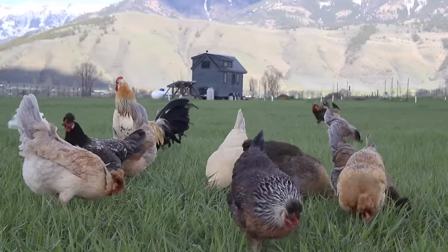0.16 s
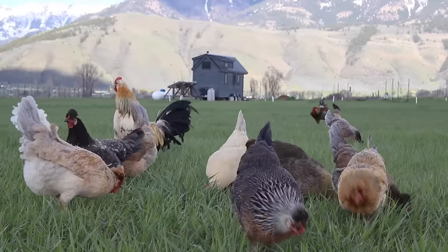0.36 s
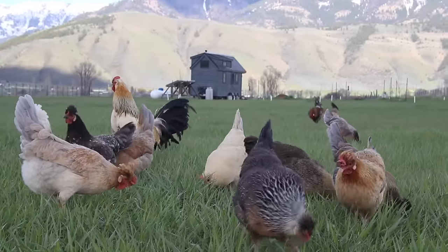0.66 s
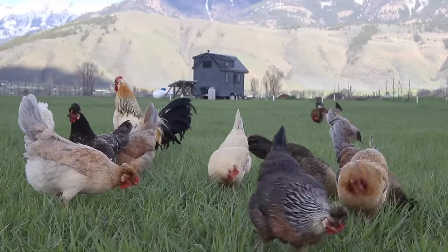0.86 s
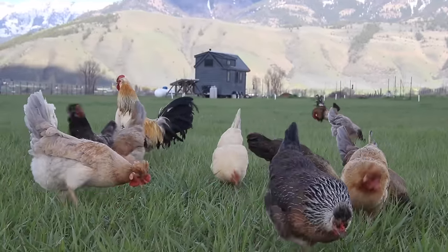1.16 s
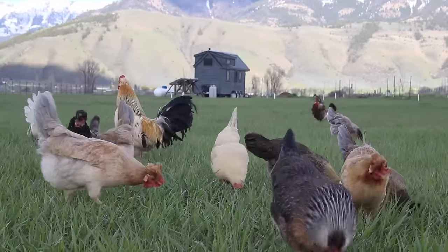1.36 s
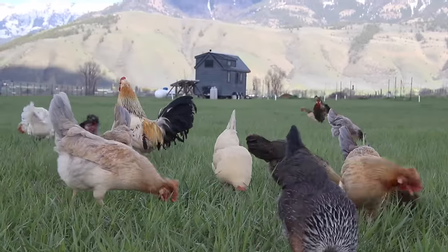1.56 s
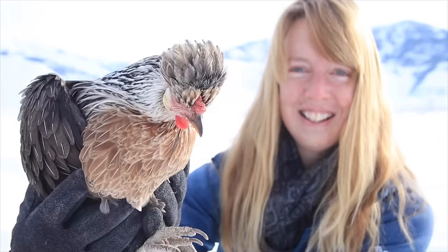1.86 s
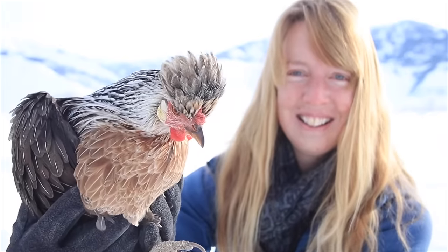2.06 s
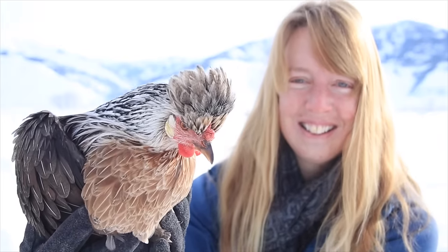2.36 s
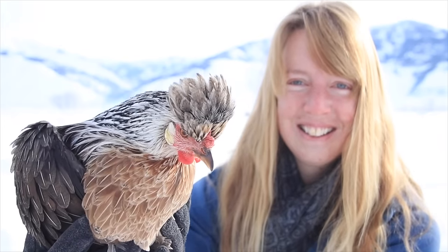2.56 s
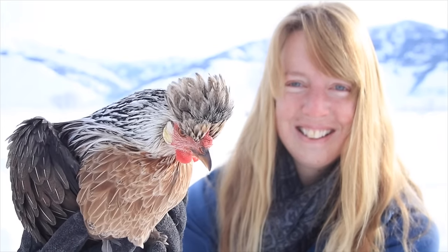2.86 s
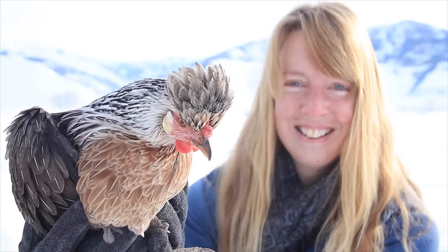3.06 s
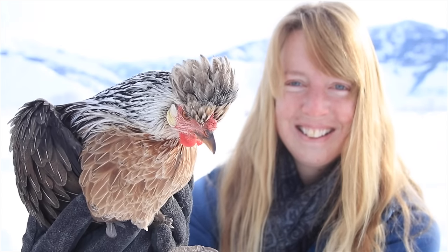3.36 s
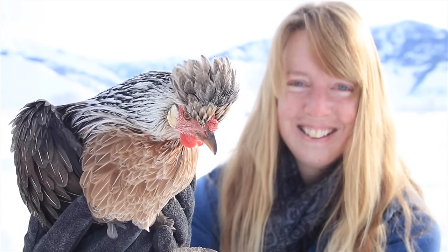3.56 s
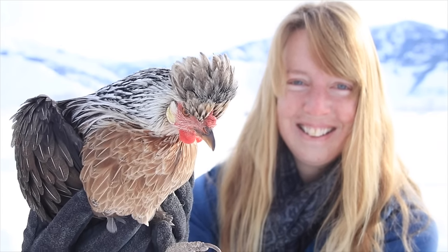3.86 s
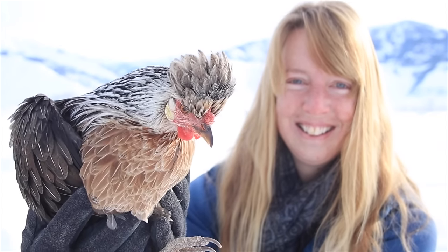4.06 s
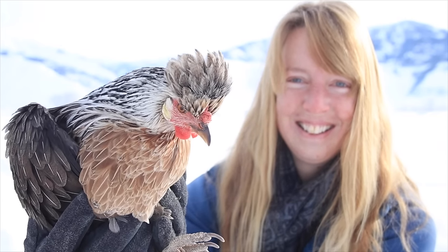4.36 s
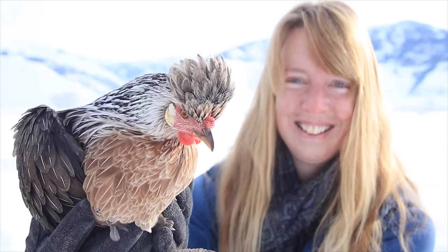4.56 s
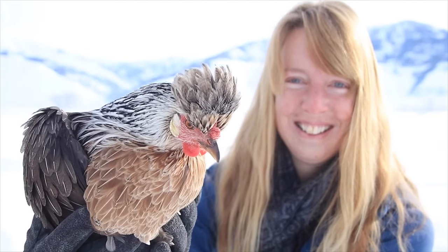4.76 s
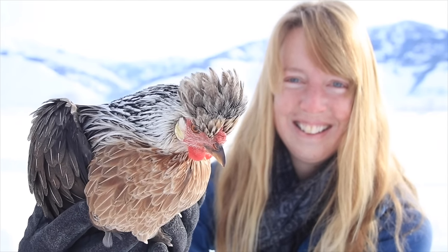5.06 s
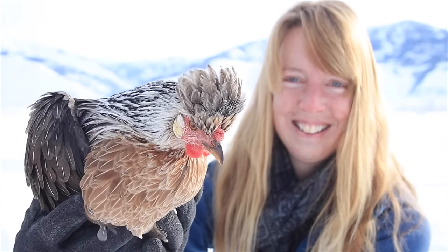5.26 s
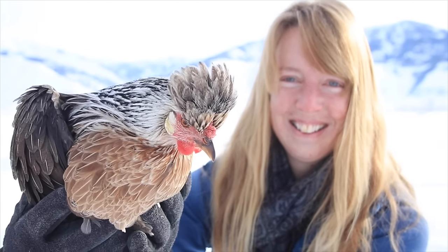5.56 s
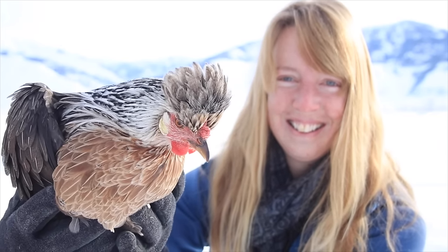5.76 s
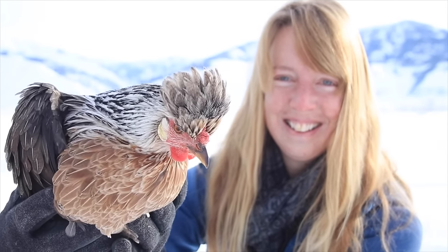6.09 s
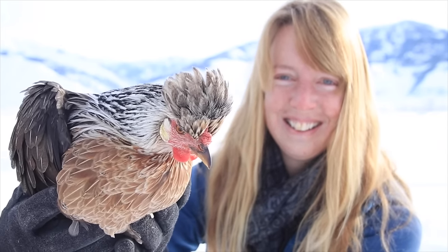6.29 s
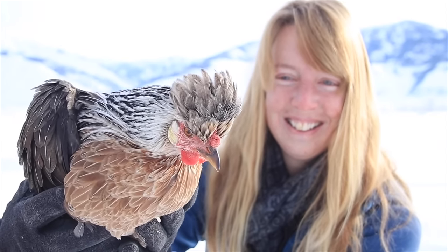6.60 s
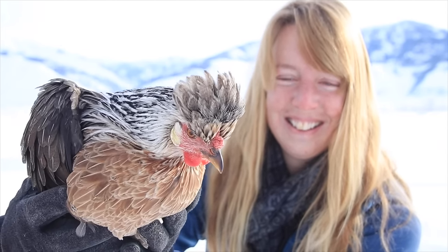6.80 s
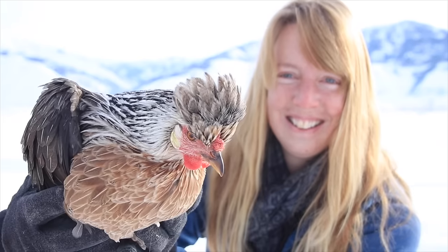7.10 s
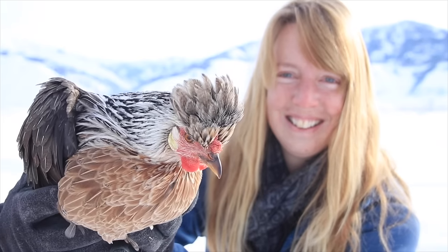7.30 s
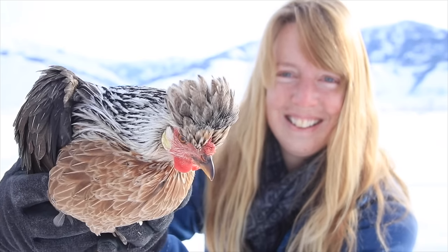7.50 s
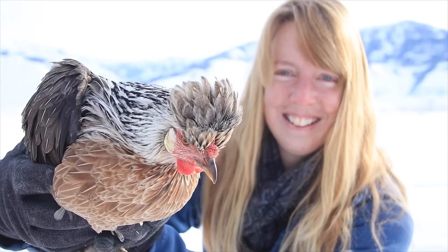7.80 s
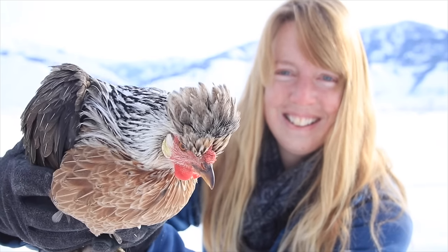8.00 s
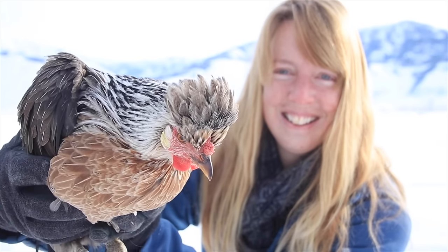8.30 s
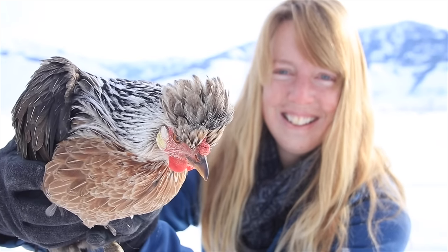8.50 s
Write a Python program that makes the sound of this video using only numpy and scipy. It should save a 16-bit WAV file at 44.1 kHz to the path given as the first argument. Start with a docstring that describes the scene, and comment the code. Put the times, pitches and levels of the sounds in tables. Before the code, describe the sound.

The sound opens in a field with low, rumbling wind buffeting the microphone, strongest around 0.5 seconds, over faintly rustling grass. At about 1.75 seconds it cuts to a blink of silence. A hen then cackles close by in short, slightly hoarse clucks, four or five a second, with a slight echo off nearby walls. She gives a long, loud squawk at 2.8 seconds, followed by a sharp cluck and more clucking. From about 4.5 to 5.9 seconds she nearly stops, and a distant hen answers softly. The close clucks resume, with a second long squawk at 6.6 seconds and two strong clucks after it, then continue evenly until about 8.6 seconds. Other chickens croon faintly in the second half, and a small bird peeps very quietly. Soft footfalls and dry ticks come near 3.9 and 8 seconds, over a low murmur of outdoor air.

```python
"""Field wind, then a cackling hen

Gusts buffet a microphone and stir grass. After a blink of silence a hen cackles close by in a yard:
syrinx harmonics shaped by throat and beak, in short arching clucks and two long squawks, echoed by walls.
A far hen answers, others croon and grunt, a small bird peeps; dry ticks and footfalls over murmuring air."""
import sys
import numpy as np
from scipy import signal
from scipy.io import wavfile
from scipy.ndimage import uniform_filter1d

SR = 44100
rng = np.random.default_rng(int(sys.argv[2]) if len(sys.argv) > 2 else 0)


def store_wav(level_fs):
    """Save 16-bit WAV to argv[1]."""
    pcm = np.round(np.clip(np.atleast_2d(level_fs), -1, 1) * 32767)
    wavfile.write(sys.argv[1], SR, pcm.T.astype(np.int16))


N = 381024

# clucks: t/s, level/dB, top f/Hz, length/s, hoarseness/0-1
NEAR_CLUCKS = [(1.784, -17.5, 449.4, 0.037, 0.38), (2.031, -17, 460.2, 0.066, 0.77),
               (2.281, -17, 449, 0.061, 0.32), (2.492, -18, 450, 0.073, 0.25),
               (2.715, -17, 455, 0.064, 0.3), (3.008, -16.5, 472, 0.042, 0), (3.184, -10, 547, 0.069, 0.11),
               (3.405, -15.5, 471.5, 0.068, 0), (3.621, -18.5, 452, 0.06, 0.14),
               (3.904, -21, 398, 0.052, 0.25), (4.137, -19.5, 417.4, 0.048, 0), (4.39, -23, 409, 0.043, .2),
               (5.226, -19, 452, 0.051, 0.18), (5.913, -21, 402.6, 0.055, 0.1),
               (6.12, -20.5, 438.4, 0.056, 0.18), (6.328, -20, 431.7, 0.058, 0.26),
               (6.554, -18, 461.5, 0.06, 0.2), (6.995, -11, 557, 0.05, .15), (7.188, -13, 486, 0.07, 0.17),
               (7.412, -17.5, 461.5, 0.067, .2), (7.657, -19.5, 457, 0.065, 0.37),
               (7.856, -18, 457.5, 0.067, 0.2), (8.081, -17, 459.5, 0.067, 0.4),
               (8.304, -16.5, 458.5, 0.066, 0.25), (8.501, -17.5, 454.2, 0.065, .1)]
FAR_CLUCKS = [(3.755, -45, 457, 0.052, 0.33), (4.595, -39.5, 453, 0.034, 0.24),
              (4.835, -41, 411, 0.027, 0.16), (5.02, -39.5, 449, 0.039, 0.15),
              (5.46, -38.5, 479, 0.052, 0.186), (5.725, -39.5, 443, 0.035, 0.16)]
# one contour per squawk: t/s, level/dB, f/Hz
NEAR_SQUAWKS = [
    [(2.809, -14.5, 474), (2.82, -15.5, 592), (2.845, -6, 609.3), (2.885, -15, 629), (2.95, -10.5, 637.8),
     (2.968, -14.5, 650), (2.982, -17, 687), (3.012, -15.5, 680), (3.036, -25, 541)],
    [(6.636, -21, 502), (6.646, -11.5, 580.5), (6.658, -10, 613.4), (6.7, -7, 616), (6.77, -23, 628.7),
     (6.792, -12, 650), (6.82, -15.5, 690), (6.836, -18, 627), (6.862, -22, 506)],
]
# held notes: t/s, length/s, level/dB, first f/Hz, last f/Hz, loudest point/0-1
FAR_SQUAWKS = [(4.535, 0.24, -54.5, 648, 704, 0.1), (6.843, .28, -37.5, 659, 698, 0.38)]
CROONS = [(5.3, 0.98, -54.5, 195, 211, 0.48), (6.801, 0.55, -54.5, 202.4, 213, .3),
          (7.451, 1.17, -49.5, 258, 266, 0.31)]
GRUNTS = [(1.832, 0.026, -28, 209.4, 203.6, 0.72)]
PEEPS = [(4.228, 0.032, -64.5, 3930, 3520, .4), (4.315, 0.029, -66, 2100, 1810, .3),
         (6.326, 0.026, -58, 2750, 3770, .5), (6.348, 0.035, -59, 3780, 3730, .2),
         (7.27, 0.032, -62, 4250, 3980, .5), (7.3, .02, -60, 4040, 2580, .6),
         (7.32, 0.035, -57.5, 2680, 2490, .3), (7.32, 0.036, -59, 2350, 1840, .3)]
# throat responses: f/Hz, gain/dB
BEAK_SHUT = [(250, -25.5), (440, -24), (560, -22.5), (700, -10), (910, 0), (1100, -3.5), (1380, -20),
             (1600, -38), (2250, -29.5), (2700, -37.5), (3300, -30), (3700, -31.5), (4300, -44),
             (5400, -55.5), (9000, -65.5)]
BEAK_OPEN = [(400, -30.5), (620, -10), (950, 5), (1280, 6.5), (1400, 8), (1600, -38), (2050, -16),
             (2700, -21.5), (3400, -24), (4900, -36), (8000, -46.5), (15700, -58.5)]
BEAK_OPEN_FAR = [(400, -35), (660, -9.5), (1350, 3), (1600, -21.5), (2050, -16), (2700, -18), (4100, -24.5),
                 (5000, -43)]
CROON_THROAT = [(200, -2), (260, -3.5), (420, 0.5), (560, -12.5), (800, -26)]
GRUNT_THROAT = [(200, 1.5), (570, -14.5), (1030, 3.5), (1470, -17), (2070, -13), (2490, -29), (3290, -18.5),
                (4600, -47), (5500, -30)]
# wall echoes: delay/s, gain/dB
WALL_ECHOES = [(.0045, -13), (.011, -15), (.017, -11), (.024, -14.5), (.032, -28.5), (.046, -26.5)]
# gusts: t/s, buffet level/dB, rumble level/dB
GUSTS = [(0.0, -45.5, -52), (0.16, -34, -59), (0.3, -20.5, -35.5), (0.374, -22.5, -68), (0.422, -8.5, -25),
         (0.476, -18.5, -32), (0.534, -6.5, -10), (0.568, -14, -36), (0.704, -28.5, -58), (0.806, -24, -44),
         (0.908, -32, -48), (1.004, -16, -48), (1.228, -27.5, -58), (1.276, -27, -61), (1.432, -40.5, -56),
         (1.496, -31, -43.5), (1.544, -31, -62), (1.745, -22, -43)]
# grass stirring: mid t/s, half-width/s, rustle rise/dB, hiss rise/dB
GRASS_STIRS = [(.1, 0.039, 2, 2), (.45, 0.064, 3, 5), (.65, 0.078, 6.5, 8.5), (.85, 0.099, 2, 5.5),
               (1.05, 0.08, 12, 7), (1.2, 0.092, 11, 2), (1.31, 0.057, 2.5, 4.5), (1.43, 0.069, 4, 7),
               (1.72, 0.19, 3.5, 4.5)]
# short dry ticks, and one faint mid-range wash of air fading over a second as the yard begins:
# t/s, level/dB, f/Hz, t60/s
NOISE_BURSTS = [(.394, -32.5, 1210, 0.063), (.935, -34, 3800, 0.0095), (1.578, -25.5, 3650, 0.0051),
                (1.598, -37, 1940, 0.013), (1.869, -53.5, 1570, 0.99), (3.8, -44, 3320, 0.11),
                (3.836, -43, 3200, 0.018), (3.869, -46, 3020, 0.029), (3.897, -51, 3220, 0.055),
                (7.861, -16.5, 300, 0.014), (8.008, -52, 2430, 0.13), (8.399, -49, 2010, 0.075)]
# footfalls: t/s, upper mode level/dB, lower mode level/dB
THUMPS = [(3.867, -33, -73), (3.902, -31.5, -42), (7.001, -45, -42), (8.004, -31, -48), (8.074, -33, -54.5)]
# board underfoot: f/Hz, t60/s
BOARD_MODES = [(218.5, 0.19), (68.6, 0.74)]
# yard air spectrum: f/Hz, relative density/dB
AIR_SPECTRUM = [(18, 5.5), (30, -32), (64, -14.5), (120, 1), (197, -4), (249, -1.5), (399, 0.5),
                (467, -2.5), (808, -7), (1290, -13), (1640, -22), (2760, -25.5), (15500, -28)]
# left-right likeness of noise: f/Hz, coherence/0-1
COHERENCE = [(250, .9993), (600, 1), (1500, 1), (3000, 0.95), (6000, 0.46), (12000, 0.53)]

FIELD_END_S, YARD_START_S = 1.748, 1.787


def cluck(start_s, db, top_hz, length_s, hoarse, unrest):
    """One push of air: pitch leaps, holds, sags. Higher clucks leap sooner and open the beak wider."""
    usual_hz = 438.5
    u = np.arange(0, 1, 1 / (length_s * SR))
    arch = 1 - 0.42 * np.exp(-(u / 0.3 * (top_hz / usual_hz) ** 2.5) ** 2.15) - 0.31 * u ** 7.3
    hz = top_hz * arch / arch.max()
    push = np.sin(np.pi * u ** 1.213)
    gape_db = -3.5 + 6 * np.tanh((top_hz - usual_hz) / 44.8)
    treble_db = gape_db - 16 * (1 - push ** 0.91)
    tone = syrinx(start_s, hz, 0.3, BEAK_SHUT, unrest, treble_db, hoarse * push ** 2)
    return start_s, amp(db) * push ** 1.057 * tone


def squawk(contour, unrest):
    """Long open-beak cry, rough as it catches and breaks off."""
    times_s, db, hz = np.transpose(contour)
    start_s, end_s = times_s[0], times_s[-1]
    t = np.arange(start_s, end_s, 1 / SR)
    db, hz = np.interp(t, times_s, db), np.interp(t, times_s, hz)
    rough = 0.35 * np.exp((start_s - t) / 0.015) + 0.64 * np.exp(-((end_s - t) / 0.038) ** 2)
    treble_db = 0.1424 * (hz - 611) - 0.62 * (db - db.max())  # rises with pitch, resists level dips
    fade = np.clip(np.minimum(t - start_s, end_s - t) / 0.0013, 0, 1)
    return start_s, unit_rms(syrinx(start_s, hz, rough, BEAK_OPEN, unrest, treble_db)) * amp(db) * fade


def held_note(start_s, length_s, db, first_hz, last_hz, peak_at, throat, unrest,
              rough, settle, dip_db, scoop=0):
    """Gliding call that swells and fades; scoop lowers the pitch at both ends."""
    u = np.arange(0, 1, 1 / (length_s * SR))
    glide_hz = last_hz + (first_hz - last_hz) * (1 - u) ** settle
    hz = glide_hz * (1 - scoop * (np.exp(-u / 0.05) + u ** 6))
    swell_db = -dip_db * np.where(u < peak_at, 1 - u / peak_at, (u - peak_at) / (1 - peak_at)) ** 2
    fade = np.clip(np.minimum(u, 1 - u) * length_s / 0.0039, 0, 1)
    return start_s, unit_rms(syrinx(start_s, hz, rough, throat, unrest)) * amp(db + swell_db) * fade


def syrinx(start_s, hz, rough, throat, unrest, treble_db=0, hoarse=0):
    """Harmonics weighted by the throat; roughness shakes each one and the pitch."""
    slow, fast = (rows[:, round(start_s * SR):][:, :len(hz)] for rows in unrest)
    phase = 2 * np.pi * np.cumsum(hz * (1 + 0.073 * rough * fast[0])) / SR
    out = np.zeros(len(hz))
    for k in range(1, int(throat[-1][0] / hz.max()) + 1):
        drift = 0.33 * np.log(max(k / 2, 1)) * slow[k % len(slow)]
        breath = (rough * (0.016 + 0.03 * k) + 0.013 * k) * fast[k % len(fast)]
        # a wider beak passes more above the main resonance
        gape_db = treble_db * np.clip(k * hz / 800 - 2, 0, 1) * np.clip(1.6 - k * hz / 7000, 0.3, 1)
        harmonic = (1 + drift) * np.sin(k * phase) + breath * np.cos(k * phase)
        out += amp(curve_at(throat, k * hz) + gape_db) * harmonic
        # every other pulse weakens: lines between harmonics
        half_harmonic = hoarse * min(k / 2, 1) ** 2 * np.sin((k + 0.5) * phase)
        out += amp(curve_at(throat, (k + 0.5) * hz) + gape_db) * half_harmonic
    return out


def birds():
    """Near hen, peeps and grunt; far flock with more echo tail."""
    near, far = np.zeros(N), np.zeros(N)
    unrest = wobble(N + SR, width=700, rows=9), wobble(N + SR, width=25, rows=9)
    for row in NEAR_CLUCKS:
        add(near, *cluck(*row, unrest))
    for contour in NEAR_SQUAWKS:
        add(near, *squawk(contour, unrest))
    for row in FAR_CLUCKS:
        add(far, *cluck(*row, unrest))
    for row in FAR_SQUAWKS:
        add(far, *held_note(*row, BEAK_OPEN_FAR, unrest, rough=0.46, settle=1.5, dip_db=17, scoop=0.135))
    for row in CROONS:
        add(far, *held_note(*row, CROON_THROAT, unrest, rough=0.2, settle=1.456, dip_db=10))
    for row in PEEPS:
        fundamental_only = [(1000, 0), (max(row[3:5]) + 1, 0)]
        add(near, *held_note(*row, fundamental_only, unrest, rough=0.085, settle=0.97, dip_db=6))
    near = butter(near, 260, "highpass", order=4)  # a small body radiates no bass
    for row in GRUNTS:
        add(near, *held_note(*row, GRUNT_THROAT, unrest, rough=0.5, settle=0.92, dip_db=3))
    return yard_echoes(near, tail_db=-15.5, t60_s=0.16) + yard_echoes(far, tail_db=-4, t60_s=0.22)


def yard_echoes(x, tail_db, t60_s):
    """Single echoes off near walls, plus a sparse tail."""
    t = np.arange(SR // 3) / SR
    tail = np.sign(rng.standard_normal(len(t))) * (rng.random(len(t)) < 0.05)
    tail *= amp(-60 * t / t60_s) * (t > 0.02)
    taps = amp(tail_db) * tail / np.linalg.norm(tail)
    taps[0] = 1
    for delay_s, db in WALL_ECHOES:
        taps[round(delay_s * SR)] += amp(db)
    return signal.oaconvolve(x, taps / np.linalg.norm(taps))[:N]


def wind_buffet(max_swing=0.75):
    """Gust pressure, nearly alike on both sides, on a diaphragm of limited swing."""
    t = np.arange(N) / SR
    times_s, *levels_db = np.transpose(GUSTS)
    buffet_db, rumble_db = (uniform_filter1d(np.interp(t, times_s, db), size=600) for db in levels_db)
    eddies = rng.standard_normal((2, 1, N)) + 0.013 * rng.standard_normal((2, 2, N))
    buffet = flatten_swells(butter(eddies[0], [11, 30], "bandpass"), width=2600)
    rumble = flatten_swells(butter(eddies[1], [55, 125], "bandpass"), width=1300)
    pressure = amp(buffet_db) * buffet + amp(rumble_db) * rumble
    return butter(max_swing * np.tanh(pressure / max_swing), 190, "lowpass")


def noise_bursts():
    """Decaying band noise: dry ticks and one slow, faint wash of air."""
    out, t = np.zeros(N), np.arange(SR // 2) / SR
    for start_s, db, hz, t60_s in NOISE_BURSTS:
        burst = unit_rms(butter(rng.standard_normal(len(t)), [0.48 * hz, 1.2 * hz], "bandpass"))
        add(out, start_s, amp(db - 60 * t / t60_s) * burst)
    return out


def footfalls():
    """Damped board modes with a low puff."""
    out, t = np.zeros(N), np.arange(SR // 2) / SR
    attack = np.clip(t / 0.0017, 0, 1)
    for start_s, *modes_db in THUMPS:
        for db, (hz, t60_s) in zip(modes_db, BOARD_MODES):
            puff = 0.94 * wobble(len(t), width=round(SR / hz / 3))[0]
            add(out, start_s, amp(db - 60 * t / t60_s) * (np.sin(2 * np.pi * hz * t) + puff) * attack)
    return out


def grass(rustle_db=-56.5, hiss_db=-57):
    """Blades rustle and crackle, louder when stirred."""
    t = np.arange(N) / SR
    for mid_s, half_width_s, rustle_rise_db, hiss_rise_db in GRASS_STIRS:
        stir = np.exp(-((t - mid_s) / half_width_s) ** 4)
        rustle_db += rustle_rise_db * stir
        hiss_db += hiss_rise_db * stir
    rustle = patchy_noise([(150, -3), (300, -1), (1000, -6), (3000, -19), (5000, -30)], patch_db=2)
    hiss = patchy_noise([(2000, -3), (3200, -0.5), (7000, -6), (12000, -5), (16000, -6)], patch_db=2)
    crackle = amp(1.6 * wobble(N, width=60))
    return amp(rustle_db) * rustle + amp(hiss_db) * unit_rms(hiss * crackle)


def yard_air():
    """Low murmur with little deep bass."""
    return amp(-50.5) * butter(patchy_noise(AIR_SPECTRUM, patch_db=1.5), 55, "highpass")


def patchy_noise(spectrum, patch_db):
    """Stereo noise, rms 1, uneven in time and frequency. Spectrum: f/Hz, level/dB."""
    frames, hz = N // 256 + 5, np.fft.rfftfreq(1024, 1 / SR)
    left_re, left_im, other_re, other_im, patches = rng.standard_normal((frames, 513, 5)).T
    patches = unit_rms(uniform_filter1d(uniform_filter1d(patches, size=8, axis=0), size=14, axis=1))
    coherence = np.clip(curve_at(COHERENCE, hz), 0, 1)[:, None]
    left = left_re + 1j * left_im
    right = coherence * left + np.sqrt(1 - coherence ** 2) * (other_re + 1j * other_im)
    bins = np.array([left, right]) * amp(curve_at(spectrum, hz)[:, None] + patch_db * patches)
    return unit_rms(signal.istft(bins, nperseg=1024, noverlap=768)[1][:, :N])


def wobble(count, width, rows=1):
    """Noise smoothed over width samples, rms 1."""
    return unit_rms(uniform_filter1d(uniform_filter1d(rng.standard_normal((rows, count)), width), width))


def flatten_swells(x, width):
    """Divides by local power, so each gust arrives at its strength."""
    return unit_rms(x / (uniform_filter1d(x ** 2, width) + 1e-12) ** 1.07)


def butter(x, hz, kind, order=2):
    return signal.sosfilt(signal.butter(order, hz, kind, fs=SR, output="sos"), x)


def curve_at(points, hz):
    points_hz, values = np.transpose(points)
    return np.interp(np.log(hz + 1), np.log(points_hz + 1), values)


def amp(db):
    return 10 ** (np.asarray(db) / 20)


def unit_rms(x):
    return x / np.sqrt(np.mean(x ** 2) + 1e-20)


def add(mix, start_s, sound):
    part = mix[round(start_s * SR):][:len(sound)]
    part += sound[:len(part)]


def scene():
    """Field, brief silence, yard."""
    t = np.arange(N) / SR
    small_sounds = butter(noise_bursts() + footfalls(), 45, "highpass")
    air = yard_air()
    field = wind_buffet() + grass() + small_sounds
    yard = birds() + small_sounds + air
    return field * (t < FIELD_END_S) + yard * np.clip((t - YARD_START_S) / 0.0093, 0, 1)


def record(dry):
    """Band limit at 15780 Hz."""
    return signal.oaconvolve(dry, signal.firwin(511, 15780, window=("kaiser", 9), fs=SR)[None], "same")


dry = scene()
out = record(dry)
store_wav(out)
```